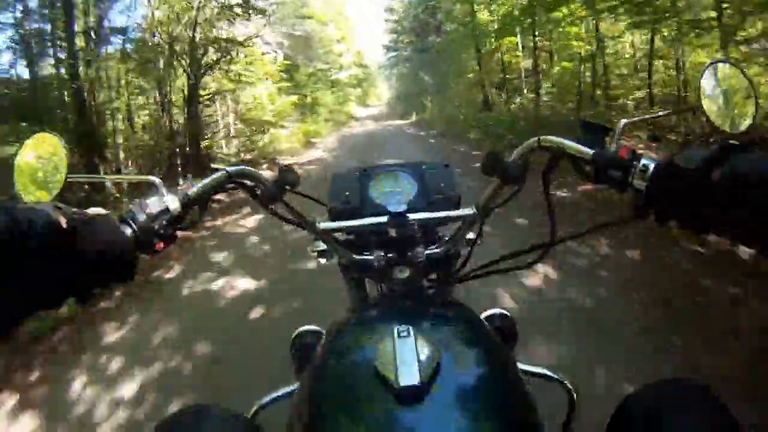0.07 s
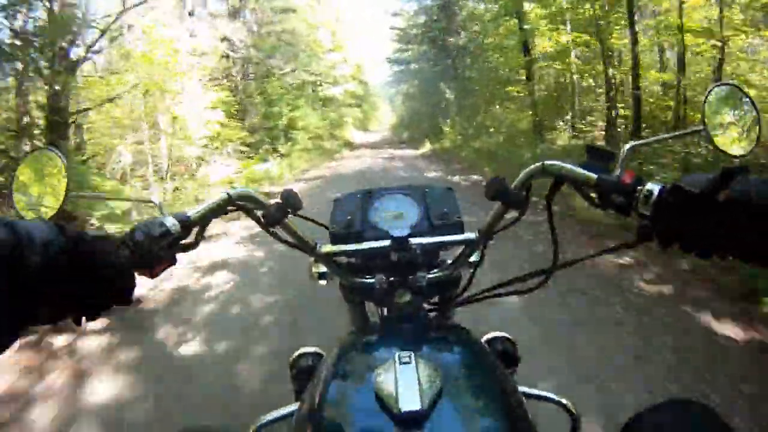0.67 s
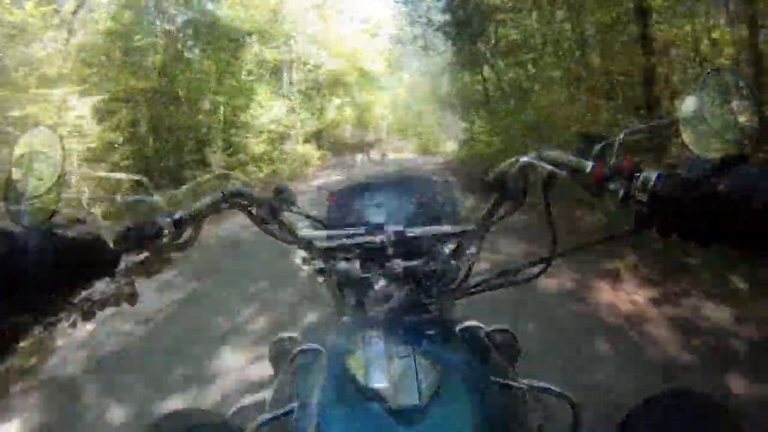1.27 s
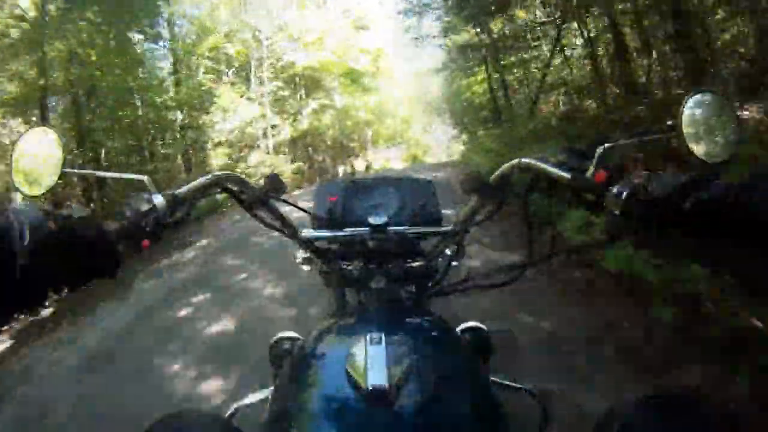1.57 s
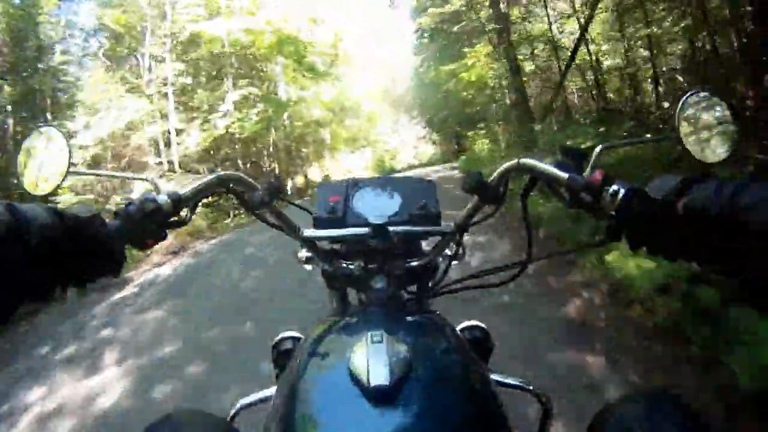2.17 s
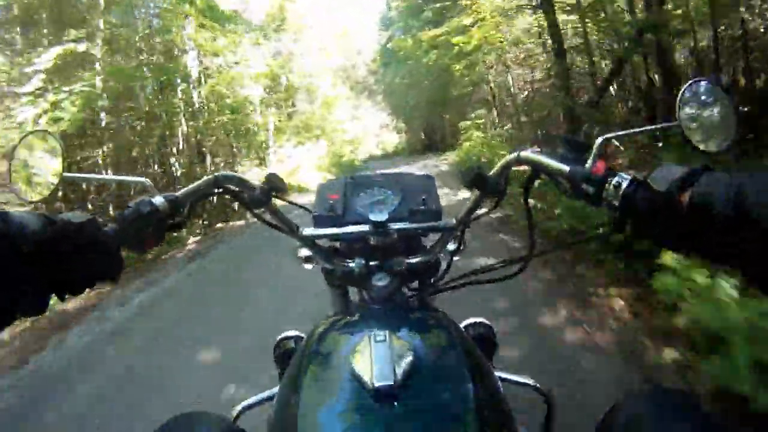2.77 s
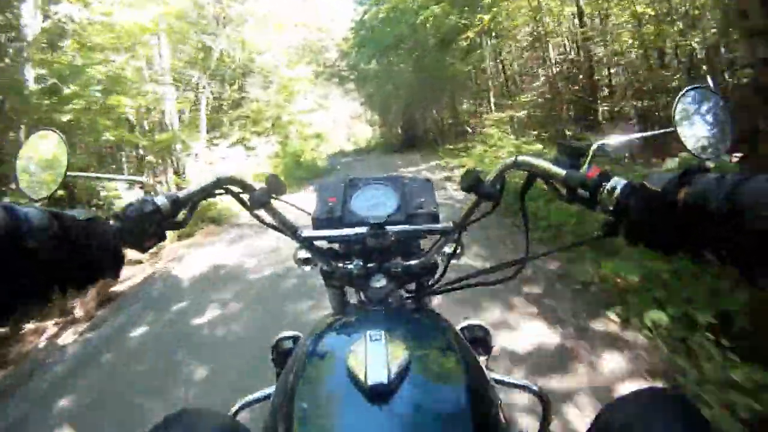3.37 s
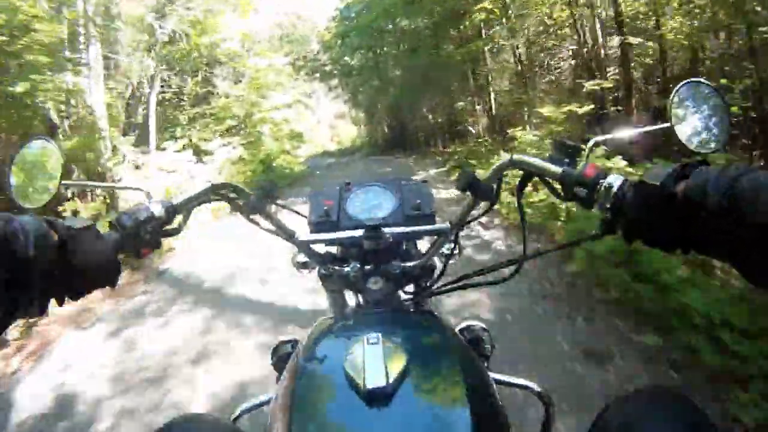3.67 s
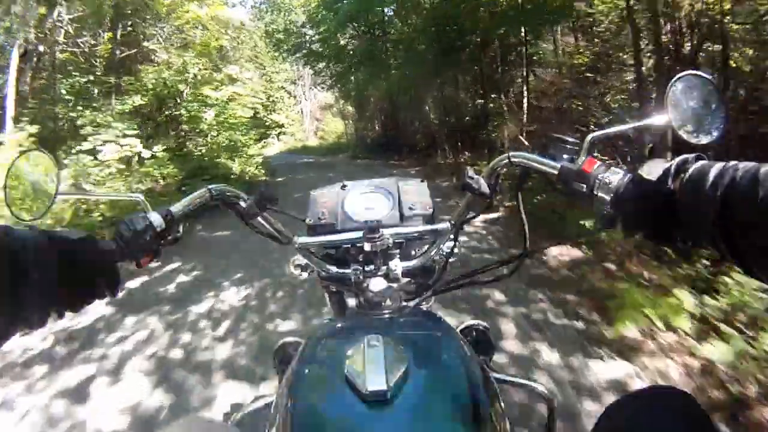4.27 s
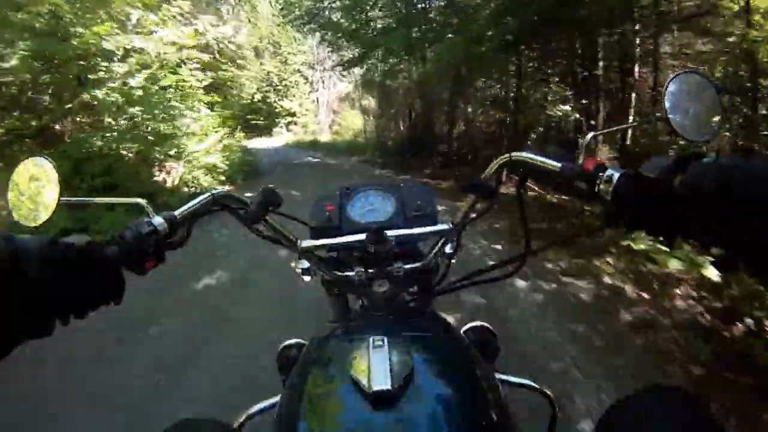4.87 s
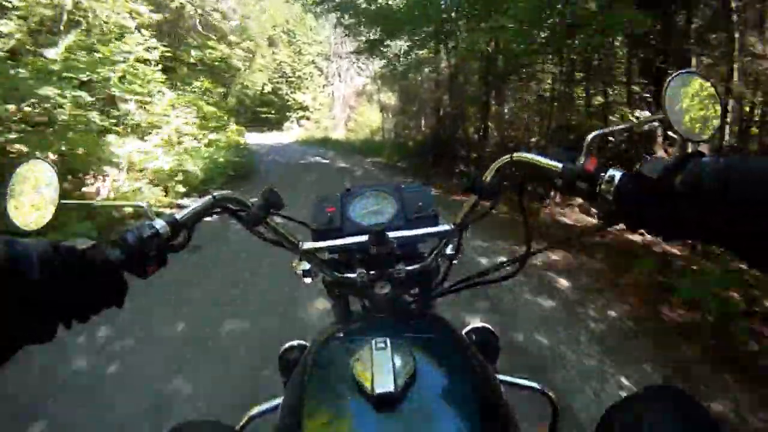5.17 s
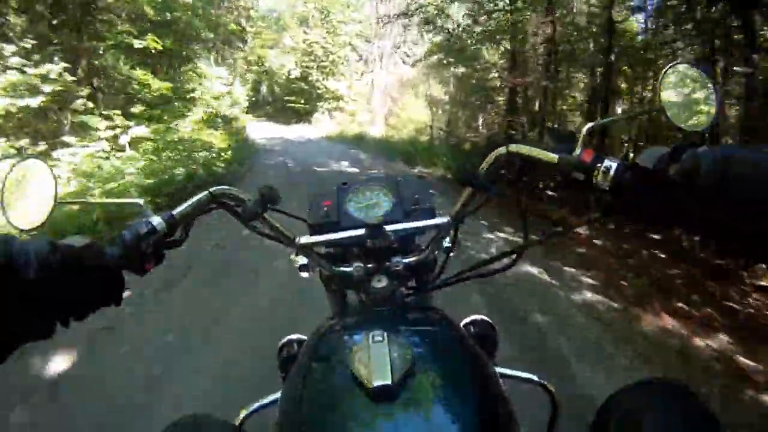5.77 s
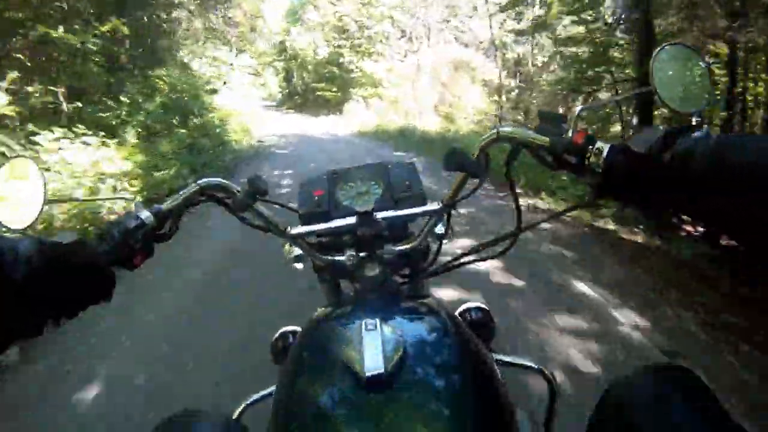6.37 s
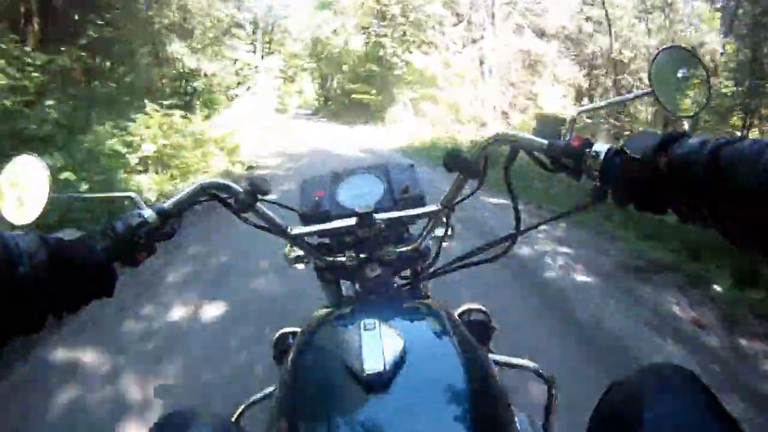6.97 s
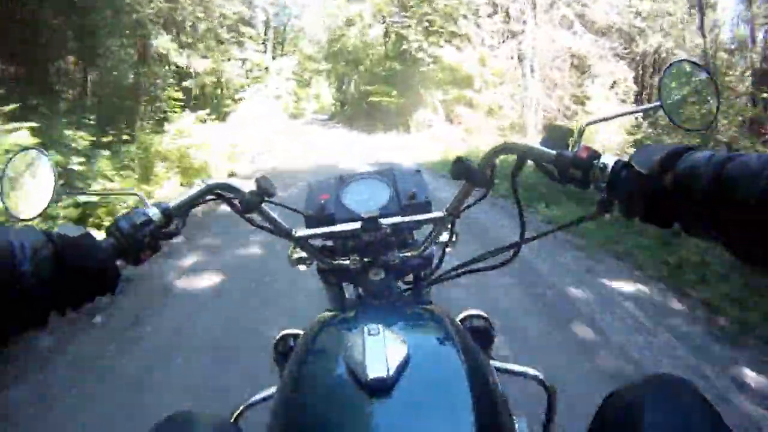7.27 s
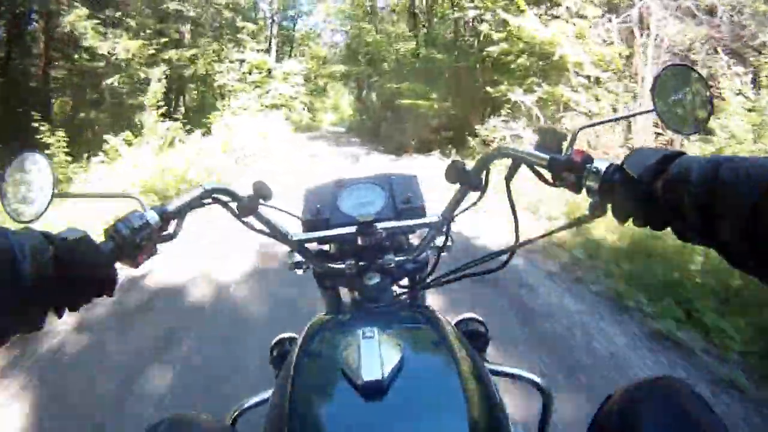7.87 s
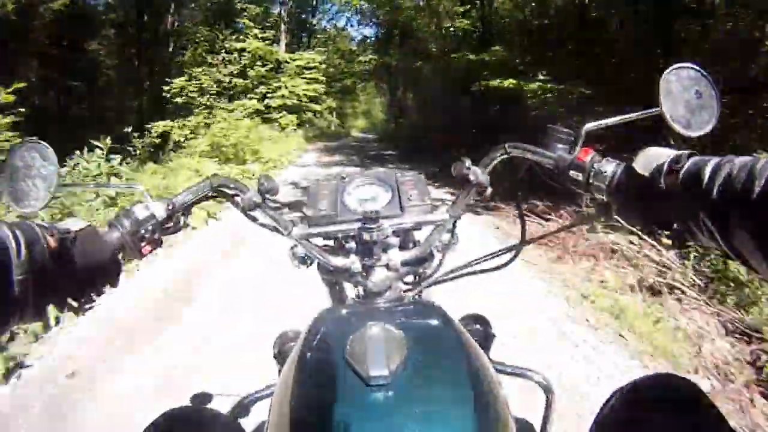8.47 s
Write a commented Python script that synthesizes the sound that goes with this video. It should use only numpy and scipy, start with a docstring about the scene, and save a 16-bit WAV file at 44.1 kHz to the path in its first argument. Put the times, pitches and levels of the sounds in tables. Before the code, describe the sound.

Wind buffets a microphone worn by a motorcycle rider, with a few gritty scrapes from the dirt road. The low, pulsing engine climbs in pitch over ticking valves, falls as the gear changes midway, and then revs higher while the tyre noise grows and a faint whine joins. All the way, the microphone's case gives irregular close knocks and small rattles, which hit harder in the later part of the ride.

```python
"""A V-twin motorcycle rides a rough dirt road, heard from a cased camera on the rider's chest.
At first grit scuffs and gusts buffet the case over the rush of the tyres. The engine pulls, its
exhaust booming and its valves clattering, then drops back for a gear change near 4 s. It pulls
harder from 6.5 s, and the final drive whines as the tyres grow louder. All along, bumps knock
the case against its mount, hardest in the last three seconds."""
import sys
import numpy as np
from scipy.fft import rfft, irfft, next_fast_len
from scipy.io import wavfile
from scipy.ndimage import map_coordinates

SR = 44100
rng = np.random.default_rng(int(sys.argv[2]) if len(sys.argv) > 2 else 0)


def wav_out(sig):
    """Save sig, one row per channel (or a flat mono array), as 16-bit PCM at SR to the path in sys.argv[1]."""
    wavfile.write(sys.argv[1], SR, np.round(np.clip(np.atleast_2d(sig).T, -1, 1) * 32767).astype(np.int16))


N = 384993


def amp(db):
    """Amplitude ratio of a level in decibels."""
    return 10 ** (np.asarray(db) / 20)


def unit(x):
    """Normalisation to rms 1."""
    return x / np.sqrt(np.mean(x ** 2) + 1e-20)


def curve(rows):
    """Linear interpolation of (t/s, value) rows at every sample."""
    return np.interp(np.arange(N) / SR, *np.transpose(rows))


def wobble(rate):
    """Smooth random modulation: a spline through rate knots a second."""
    return map_coordinates(rng.standard_normal(int(N * rate / SR) + 4), [np.arange(N) * rate / SR])


def swells(rows):
    """Sum of Gaussian envelopes from (t/s, duration/s, level/dB) rows."""
    t = np.arange(N) / SR
    return sum(amp(db) * np.exp(-(2 * (t - s) / length) ** 2) for s, length, db in rows)


def response(points):
    """Frequency response through (f/Hz, level/dB) points on a log axis."""
    f, db = np.transpose(points)
    return lambda hz: amp(np.interp(np.log(hz + 1), np.log(f), db))


def filtered(x, gain, causal=False):
    """Spectral filtering; causal uses minimum phase, so ringing only follows a pulse."""
    m = 2 * next_fast_len(N // 2 + SR // 4)
    g = gain(np.fft.rfftfreq(m, 1 / SR))
    if causal:
        cepstrum = irfft(np.log(g + 1e-6))
        fold = 1 + np.sign(m // 2 - np.arange(m))
        g = np.exp(rfft(cepstrum * fold) - cepstrum[0])
    return irfft(rfft(x, m) * g, m)[:N]


def ring(modes, t, detune=0.025):
    """Free vibration of damped (f/Hz, level/dB, T60/s) modes, varied at each blow; peak 1."""
    draws = rng.standard_normal((len(modes), 2))
    y = sum(amp(db + a - 60 * t / t60) * np.sin(2 * np.pi * hz * (1 + detune * b) * t)
            for (hz, db, t60), (a, b) in zip(modes, draws))
    y *= 1 - np.exp(-t / 0.0003)  # rounded onset
    return y / np.abs(y).max()


def add(track, s, sound):
    """Superposition of a sound on the track, s seconds in."""
    i = max(round(s * SR), 0)
    track[i:i + len(sound)] += sound[:max(N - i, 0)]


# Tyre rush, which air, chatter and engine also follow: t/s, level/dB
RUSH_LEVEL = [(0, -48), (.25, -50), (.6, -53), (1.05, -58), (1.45, -60), (2.15, -54), (2.8, -49.5),
              (3.35, -48), (4.05, -48), (5.3, -44.5), (6.1, -44.5), (6.7, -43), (7.5, -40.5), (8.15, -40.5),
              (8.6, -38.5)]
# Spectrum of tyres on dirt: f/Hz, level/dB
TYRE_SPECTRUM = [(120, -27), (250, -1), (400, -3.5), (570, -4.5), (780, 2.5), (880, -2.5), (1000, 4.5),
                 (1100, 7), (1220, -5), (1450, -13.5), (2000, -24.5), (4000, -102)]
def tyres(lumpy_db, grit_db):
    """Roughness excitation: lumps and grit modulate the noise of rolling contact."""
    contact = amp(lumpy_db * wobble(35) + grit_db * wobble(400))
    rush = filtered(rng.standard_normal(N) * contact, response(TYRE_SPECTRUM), causal=True)
    return amp(curve(RUSH_LEVEL)) * unit(rush)


# Spectrum of air on the case: f/Hz, level/dB
EDDY_SPECTRUM = [(5, -32), (14, 1.5), (30, 5), (60, 2.5), (100, -4), (160, -10.5), (280, -27), (400, -27.5),
                 (900, -65)]
# Gusts added to the steady buffeting: t/s, duration/s, relative level/dB
AIR_GUSTS = [(.1, 0.45, 4), (.38, 0.15, 11.5), (.72, 0.38, 11), (1.3, 0.86, 6), (5.25, 0.32, 2),
             (5.9, 1.9, -0.5), (7.02, 0.2, 3), (8.57, 0.094, 1)]
def buffeting(air_db, gusty_db, judder_db, judder_slope, gust_judder):
    """Turbulent pressure and forced vibration: air and road shake the case; gusts swell both."""
    eddies = filtered(rng.standard_normal(N), response(EDDY_SPECTRUM)) * amp(gusty_db * wobble(9))
    washboard = response([(40, -14), (75, -0.5), (105, 0), (150, -9), (280, -16), (400, -40.5),
                          (900, -79)])
    judder = filtered(rng.standard_normal(N), washboard) * amp(2.5 * wobble(14))
    rush_db, gust = curve(RUSH_LEVEL), swells(AIR_GUSTS)
    air = amp(rush_db + air_db) * (1 + gust) * unit(eddies)
    shake_db = judder_db + judder_slope * (rush_db - rush_db.mean())
    return air + amp(shake_db) * (1 + gust_judder * gust) * unit(judder)


# Gritty scuffs: t/s, duration/s, level/dB
SCUFF_EVENTS = [(.097, 0.013, -48), (0.163, 0.01, -44), (0.198, 0.04, -48), (0.28, 0.051, -42.5),
                (2.413, 0.065, -49)]
# Their spectrum: f/Hz, level/dB
SCUFF_SPECTRUM = [(300, 0), (900, 17.5), (1500, 3), (2150, 13), (2800, 5.5), (3500, 5), (5200, 2),
                  (6000, -17), (7000, 0), (10000, -3.5), (15000, -26)]
def scuffs():
    """Friction noise: grit scrapes in short, grainy swells."""
    grit = rng.standard_normal(N) * amp(3.5 * wobble(600))
    return swells(SCUFF_EVENTS) * unit(filtered(grit, response(SCUFF_SPECTRUM), causal=True))


# Modes of small rattles: f/Hz, level/dB, T60/s
RATTLE_MODES = [(412, -1.5, 0.048), (539, -3, 0.019), (740, 6, 0.012), (1120, -13, 0.017)]
def chatter(over_rush_db, spread_db, count):
    """Random impacts: small stones rattle the mount, harder as the tyres get louder."""
    out, t = np.zeros(N), np.arange(SR // 16) / SR
    for when, softness in rng.random((count, 2)):
        rattle = ring(RATTLE_MODES, t, detune=0.16)
        add(out, when * N / SR, amp(over_rush_db - spread_db * softness) * rattle)
    return out * amp(curve(RUSH_LEVEL))


# Knocks of the case: t/s, level/dB, relative thud level/dB, relative crack level/dB
CASE_KNOCKS = [(0.091, -32.5, -3, -5), (0.245, -29, -4, -15), (0.326, -35, 3, -6), (0.689, -34, -11, -28),
               (1.497, -39, -6, -18), (1.549, -27, -5, -13), (1.689, -38, 0, -23),
               (1.778, -26.5, -3.5, -21), (2.116, -34.5, -14, -25), (2.301, -30.5, 0.5, 1),
               (2.577, -27.5, -6, -17), (2.869, -25.5, -1.5, -16), (3.631, -35, -15, -9),
               (3.788, -36, -26, -6), (4.095, -24.5, -14.5, -16), (4.342, -27, -4, -11),
               (4.909, -31, -3, -16), (5.454, -32, -3.5, -21), (5.632, -31, -6, -15),
               (5.73, -24, -0.5, -37), (6.039, -14.5, -9, -20), (6.088, -30.5, -8, -9),
               (6.196, -23.5, -11, -7), (6.255, -20.5, -11, -16), (6.318, -27, -10, -19),
               (6.436, -27, -10, -19), (6.732, -20, -5, -20), (6.896, -22.5, -8, -19),
               (7.218, -26.5, -8, -13), (7.452, -13, -2.5, -15), (7.689, -25, -1, -25),
               (8.47, -22.5, -2, -22), (8.497, -20, -7.5, -15)]
# Modes of the case shell and of its mount: f/Hz, level/dB, T60/s
SHELL_MODES = [(474, -8, 0.017), (620, 2, 0.007), (695, 8, 0.021), (796, -7, 0.076), (983, -16, 0.042),
               (1230, -40, 0.034), (1820, -9.5, 0.015), (2220, -12, 0.041), (3400, -31, 0.021),
               (3580, -45, 0.025)]
MOUNT_MODES = [(124, -13, 0.032), (187, 9, 0.052), (251.7, 21.5, 0.031)]
# Soft jolts of the mount and clinks of loose metal fittings: t/s, level/dB, f/Hz
MOUNT_JOLTS = [(0.219, -19.5, 90), (0.368, -20.5, 110), (.395, -20, 97), (1.782, -26, 110),
               (1.861, -29, 100), (2.593, -26, 100), (5.735, -15.5, 106), (6.041, -14, 230),
               (7.453, -16, 170)]
METAL_CLINKS = [(.329, -39, 486), (3.015, -31.5, 1090)]
def knocks(rebound_s, rebound_gain, click_db, click_t60, crack_t60):
    """Impact excitation: the case hits its mount and rebounds; modes ring, contact noise cracks."""
    out, cracks, clicks = np.zeros((3, N))
    t = np.arange(SR // 8) / SR
    burst = lambda t60: amp(-60 * t / t60) * rng.standard_normal(len(t))
    for s, db, thud_db, crack_db in CASE_KNOCKS:
        contact = s + 0.0015
        add(out, contact, amp(db) * ring(SHELL_MODES, t))
        add(out, contact + rebound_s, rebound_gain * amp(db) * ring(SHELL_MODES, t))
        add(out, contact, amp(db + thud_db + 5) * ring(MOUNT_MODES, t))
        add(cracks, contact, amp(db + crack_db + 3.5) * burst(crack_t60))
        add(clicks, contact, amp(db + click_db) * burst(click_t60))
    for s, db, hz in MOUNT_JOLTS:
        add(out, s, amp(db - 2) * ring([(hz, 0, 6 / hz)], t))  # dies in six periods
    for s, db, hz in METAL_CLINKS:
        add(out, s, amp(db) * ring([(hz, 0, 0.045)], t))
    crack_colour = response([(300, -3.5), (650, 9.5), (1400, -5), (2100, 10.5), (2800, -11),
                             (3600, 1.5), (4500, -20), (6000, -18), (15000, -13)])
    click_colour = response([(1000, -24), (6000, -36), (9000, -4.5), (11000, 4), (12800, 3.5),
                             (15000, -18)])
    return out + filtered(cracks, crack_colour, causal=True) + filtered(clicks, click_colour)


def whine(peak_s, length_s, db, peak_hz, hz_per_s):
    """Gear meshing: the tone of the final drive swells and climbs as the bike gathers speed."""
    hz = peak_hz + hz_per_s * (np.arange(N) / SR - peak_s)
    tone = np.sin(2 * np.pi * np.cumsum(hz) / SR)
    return swells([(peak_s, length_s, db)]) * amp(1.3 * wobble(25)) * unit(tone)


# Rate of four-stroke cycles: t/s, f/Hz
CYCLE_RATE = [(0.2, 12.09), (0.55, 13.5), (0.8, 12.4), (1.35, 12.95), (1.8, 14.33), (2.7, 15.35),
              (3.43, 15.9), (3.8, 12.23), (4.07, 10.95), (4.95, 11.9), (5.7, 11.98), (6.2, 12.4),
              (6.6, 13.45), (7.0, 15.3), (7.4, 17.2), (7.85, 18.7), (8.73, 19.2)]
# Throttle: t/s, opening (0-1)
THROTTLE_OPENING = [(0, 0.4), (.6, 0), (1.55, 0.2), (2, 0.93), (3.4, 0.67), (3.7, .25), (4.7, 0.2),
                    (5.2, 0.6), (6.5, 0.5), (7, 0.9), (8.73, 0.63)]
def drive(over_rush_db, octave_db, throttle_db, cruise_hz=12):
    """Speed and load law: an engine layer's gain follows tyre rush, cycle rate and throttle."""
    octaves = np.log2(curve(CYCLE_RATE) / cruise_hz)
    load_db = throttle_db * curve(THROTTLE_OPENING)
    return amp(curve(RUSH_LEVEL) + over_rush_db + octave_db * octaves + load_db)


def crank(cycles):
    """Rotational harmonic: the crankshaft, turning twice a cycle, hums at its fourth order."""
    hum = np.sin(2 * np.pi * 8 * cycles)
    return drive(over_rush_db=-7, octave_db=7, throttle_db=4.2) * amp(1.2 * wobble(26)) * unit(hum)


# Resonances of the case that pass the clatter: f/Hz, bandwidth/Hz, level/dB
CASE_RESONANCES = [(1705, 170, -4.5), (1972, 235, 1.5), (2378, 400, 3.5), (3084, 320, -4.5),
                   (3658, 605, -8.5), (4515, 330, -17), (5070, 590, -15), (5550, 150, -15.5),
                   (6730, 520, -16.5), (7210, 660, -18.5), (8400, 960, -15), (9020, 170, -13),
                   (9670, 690, -10), (11010, 440, -12), (11940, 95, -9.5), (12230, 87, -18),
                   (12750, 320, -12.5), (14330, 650, -11), (15150, 400, -24)]
def case(hz):
    """Resonant transmission: the peaks of the camera case add in power."""
    return np.sqrt(sum((amp(db) / (1 + (2 * (hz - centre) / width) ** 2)) ** 2
                       for centre, width, db in CASE_RESONANCES))


# Valve strikes: phase/cycle, relative amplitude
VALVE_STRIKES = [(0.312, 0.78), (0.499, 0.25), (0.749, 0.53)]
def strikes(cycles, decay_cycles):
    """Exponential decay: each valve strike is a noise burst locked to the camshaft."""
    noise = rng.standard_normal(N)
    envelope = sum(size * np.exp(-((cycles - phase) % 1) / decay_cycles)
                   for phase, size in VALVE_STRIKES)
    return noise * envelope * amp(1.7 * wobble(30))


def clatter(cycles, tick_db, grit_db):
    """Periodic impacts: valves tick and tappets click over steady mechanical noise."""
    steady = unit(filtered(rng.standard_normal(N) * amp(grit_db * wobble(500)), case))
    bright = response([(1500, -7.5), (3000, 6.5), (5000, 11), (10000, 4), (15000, -30)])
    ticks = unit(filtered(strikes(cycles, decay_cycles=0.27), lambda hz: case(hz) * bright(hz)))
    thin = response([(3000, -32), (4800, -25), (5500, 9.5), (6000, -68), (6400, 10), (7000, -25),
                     (9000, -10), (12200, -5), (15000, 4.5)])
    tappets = unit(filtered(strikes(cycles, decay_cycles=0.05), thin))
    tappets *= drive(over_rush_db=-12.5, octave_db=-2, throttle_db=-1)
    valve_gear = steady + amp(tick_db) * ticks
    return drive(over_rush_db=-4.5, octave_db=5, throttle_db=0.44) * valve_gear + tappets


# Responses of the exhaust pipe, low boom and higher bark: f/Hz, level/dB
PIPE_BOOM = [(20, -38.5), (45, -20), (58, -5.5), (80, -3.5), (95, 1), (114, 3.5), (128, 1.5), (150, -5.5),
             (200, -28), (400, -63)]
PIPE_BARK = [(90, -46.5), (150, -8), (190, 3.5), (230, 1.5), (265, 6), (300, 3.5), (340, 1.5), (380, -17.5),
             (450, -12.5), (560, -27), (740, -13), (790, -7), (850, -22.5), (1600, -51)]
def exhaust(cycles):
    """Source and filter: two unevenly spaced firings a cycle excite the pipe's resonances."""
    pulses = np.zeros(N)
    starts = np.arange(int(cycles[-1]) + 1)
    for phase, strength in [(0, 1), (3 / 8, 0.9)]:
        scatter = amp(0.7 * rng.standard_normal(len(starts)))
        firings = np.interp(starts + phase, cycles, np.arange(N)).astype(int)
        pulses += np.bincount(firings, strength * scatter, N)
    boom = unit(filtered(pulses, response(PIPE_BOOM), causal=True))
    bark = unit(filtered(pulses, response(PIPE_BARK), causal=True))
    boom *= drive(over_rush_db=6.5, octave_db=9.7, throttle_db=-1.2)
    bark *= drive(over_rush_db=-15, octave_db=11.8, throttle_db=11.8)
    return amp(1.2 * wobble(9)) * (boom + bark)


def scene():
    """Superposition at one microphone, alike in both channels."""
    cycles = np.cumsum(curve(CYCLE_RATE)) / SR
    engine = exhaust(cycles) + crank(cycles)
    engine += whine(peak_s=7.25, length_s=2.2, db=-51.5, peak_hz=397, hz_per_s=38)
    engine += clatter(cycles, tick_db=-5.5, grit_db=1)
    road = tyres(lumpy_db=1, grit_db=2)
    road += buffeting(air_db=1.5, gusty_db=1.5, judder_db=-40.5, judder_slope=0.82, gust_judder=0.2)
    road += scuffs()
    mount = knocks(rebound_s=0.0023, rebound_gain=0.52, click_db=-19, click_t60=0.038, crack_t60=0.043)
    mount += chatter(over_rush_db=16.5, spread_db=11, count=140)
    return np.tile(engine + road + mount, (2, 1))


def record(dry):
    """Band limiting: the camera keeps nothing above its cutoff."""
    cutoff_hz = 15400
    return np.array([filtered(channel, lambda hz: hz < cutoff_hz) for channel in dry])


dry = scene()
out = record(dry)
wav_out(out)
```